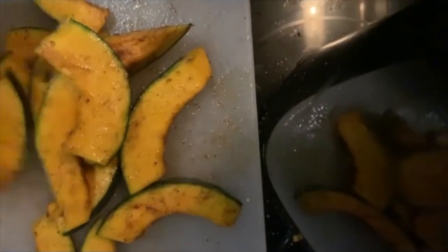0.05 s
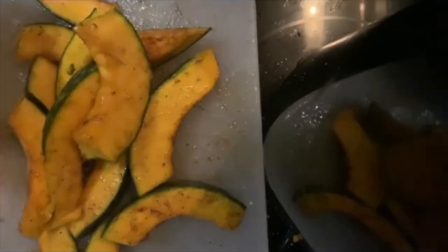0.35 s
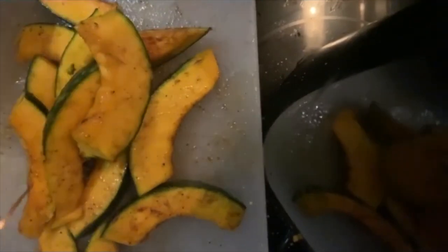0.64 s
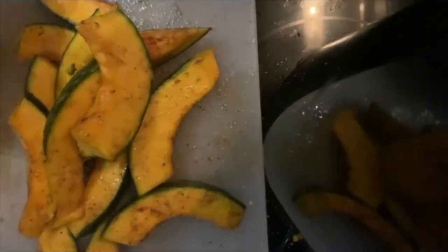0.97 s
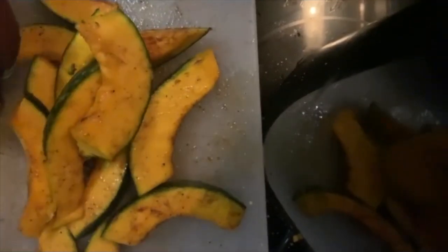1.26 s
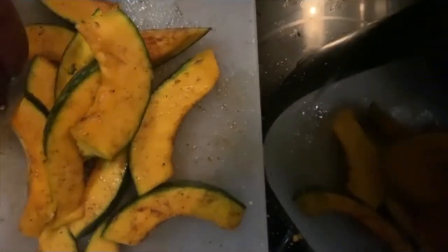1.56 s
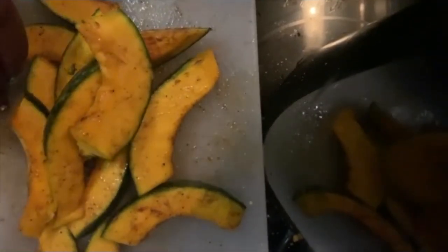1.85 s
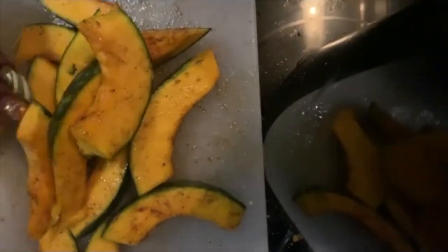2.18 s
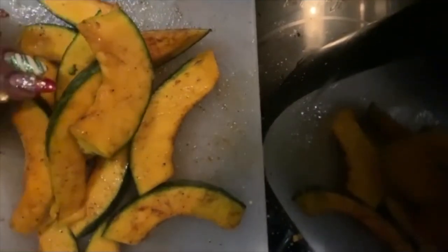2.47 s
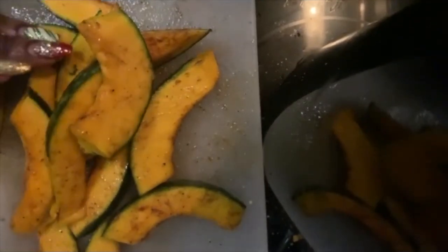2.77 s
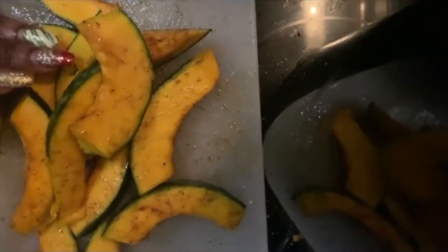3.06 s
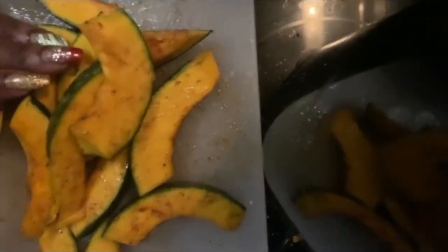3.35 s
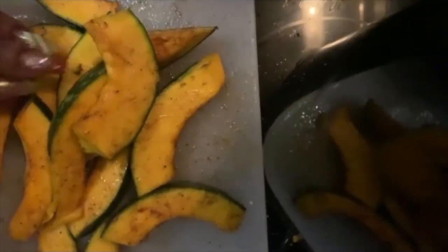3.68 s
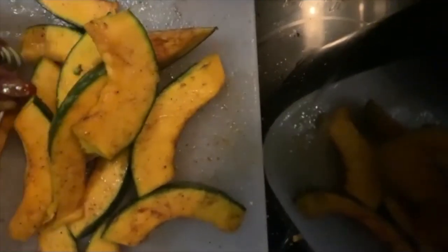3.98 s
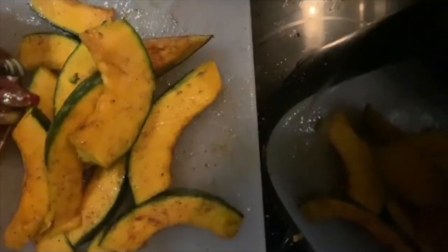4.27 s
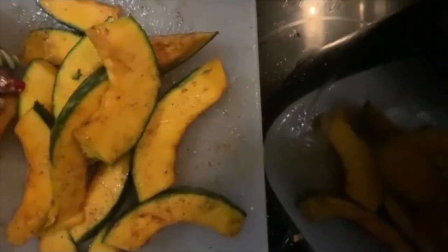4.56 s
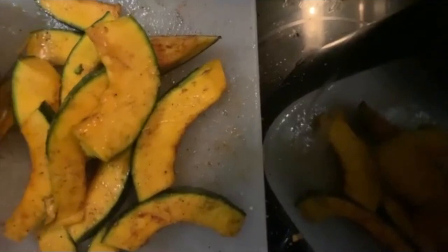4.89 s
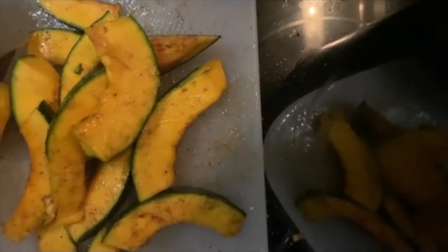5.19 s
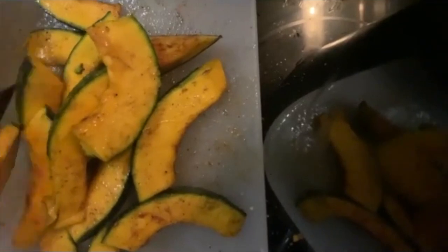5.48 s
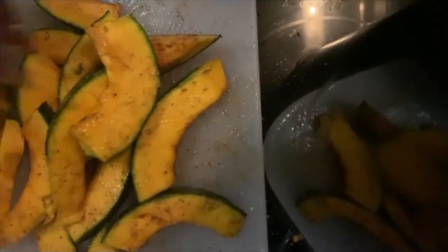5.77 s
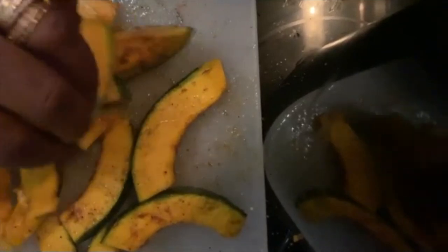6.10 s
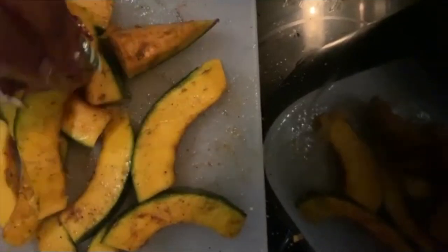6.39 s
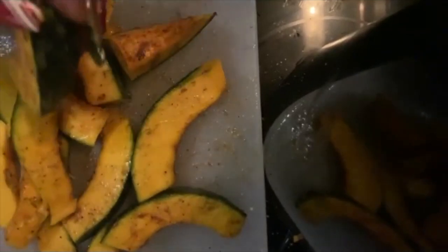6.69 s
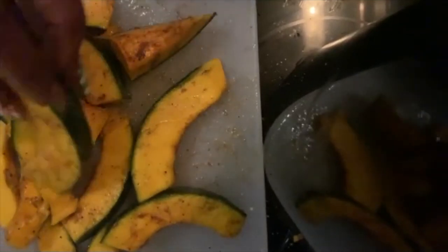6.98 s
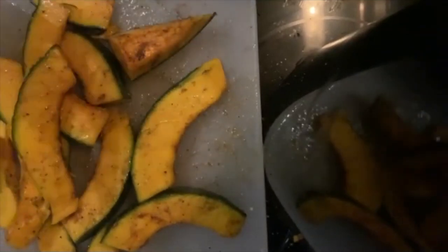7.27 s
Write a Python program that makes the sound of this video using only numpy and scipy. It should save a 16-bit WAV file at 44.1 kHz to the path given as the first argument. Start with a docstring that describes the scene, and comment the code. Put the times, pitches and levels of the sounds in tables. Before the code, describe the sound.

Wet squash slices are handled on a plastic cutting board, with squelches, smacks and a few dull knocks in a quiet kitchen.

```python
"""Quiet kitchen: a hand gathers wet squash slices on a plastic cutting board, close up.
Slices and fingers rub by stick-slip; wet faces squeak, peel apart and smack on trapped air,
and small bubbles burst in the film. Landing slices ring the board's low modes and jolt the counter.
Nails tick, touched steel rings faintly, and a small motor throbs over soft room air."""
import sys
import numpy as np
from scipy import signal
from scipy.fft import rfft, irfft
from scipy.io import wavfile
from scipy.ndimage import map_coordinates

SR = 44100
rng = np.random.default_rng(int(sys.argv[2]) if len(sys.argv) > 2 else 0)


def wrap_up_sound(samples):
    """Save the sound to the file named by the first command line argument, as 16-bit audio."""
    columns = np.atleast_2d(samples).T
    # keep every value between -1 and 1, then stretch to whole-number steps
    tamed = np.clip(columns, -1, 1)
    steps = np.round(tamed * 32767).astype(np.int16)
    wavfile.write(sys.argv[1], SR, steps)


N = 328104
T = np.arange(N) / SR

# motor speed: time_s, shaft_hz
SHAFT_SPEED = [(0, 31.25), (3.8, 31.25), (4.3, 31.145), (7.44, 31.14)]
# motor lines: shaft_multiple, twice_mains_multiple, level_db
HUM_LINES = [(2, 0, -12), (3, 0, -1), (4, 0, -6), (6, 0, -15), (7, 0, -10), (8, 0, -16), (10, 0, -12),
             (-1, 1, -5), (0, 1, 0), (1, 1, -11), (2, 1, -18)]
# gain on the background, ducking and recovering: time_s, gain_db
BACKGROUND_GAIN = [(0, -66), (.75, -69), (1.2, -65), (2, -62), (2.8, -60), (3.6, -63), (4.05, -71),
                   (4.5, -63), (5.3, -63), (5.85, -67), (6.15, -61.5), (6.6, -63.5), (7.44, -63.5)]
# room air, counter rumble: freq_hz, level_db
AIR_SPECTRUM = [(20, -29), (45, -21.5), (90, -1), (200, -2), (320, -4), (410, -23), (560, -7), (750, -20),
                (1200, -46.5), (1650, -33.5), (1950, -19), (2300, -39.5), (2900, -46), (10000, -53)]
COUNTER_SPECTRUM = [(15, -52), (30, -22), (50, -3), (90, -0.5), (165, -2), (250, -8.5), (380, -11),
                    (700, -36), (1500, -70)]
# hand leaning on the pile: start_s, length_s, level_db, swell_db
SHOVES = [(0.119, .014, -27, -5), (0.341, 0.031, -37.5, -13.5), (2.555, 0.059, -50, -15),
          (3.058, .018, -37.5, 1.5), (3.078, 0.05, -20, 1), (3.159, 0.028, -23.5, 0),
          (3.229, 0.057, -29.5, -5), (3.332, 0.017, -37.5, -5.5), (4.675, 0.015, -38.5, -6),
          (4.755, 0.13, -46, 1), (4.963, 0.019, -37, -7.5)]

# steel damped by wet slices, loaded board: freq_hz, level_db, t60_s
STEEL_MODES = [(2778, -14, .22), (3004, -8, .08), (3065, -10, .1), (3290, -8, .07), (3542, -9, .1),
               (4020, -10, .1), (4330, -10, .07), (6200, -14, .2), (6387, -5, .09), (6795, -14, .12),
               (7224, -9, .22), (7310, -8, .06), (7700, -12, .1), (8440, -6, .05), (8535, 0, .105),
               (8620, -7, .06), (9125, -13, .08), (9808, -15, .06)]
BOARD_MODES = [(554, 0, .088), (625, .5, .04), (480, -4, .032), (705, -17, .11), (930, -17, .04),
               (310, -12, .05), (235, -5, .05), (140, -9, .045)]
# fingernail: freq_hz, level_db, t60_s
NAIL_MODES = [(2100, 0, .0045), (2450, -14, .005), (1800, -28, .025)]
# touches on steel: start_s, level_db
CLINKS = [(.362, -46), (2.901, -34), (2.942, -46), (3.079, -33), (3.095, -32), (5.052, -31), (5.0795, -27)]
# nail flicks: start_s, peak_db, pan_db (left minus right throughout)
NAIL_TICKS = [(1.979, -43.5, -25), (2.8598, -9, -6), (4.495, -36, -23.5)]
# slices landing and rocking: start_s, level_db, pitch_hz, build_s
KNOCKS = [(0.1065, 1, 555, 0.0011), (0.1246, -18, 552, 0.0082), (0.232, -36.5, 546, 0.0035),
          (.36, -25.5, 576, 0.005), (2.864, -22.5, 565, 0.0018), (3.0845, -5, 543, 0.0034),
          (3.095, -12.5, 552, 0.00067), (3.108, -13, 550, 0.00084), (4.271, 0, 559, 0.00079),
          (4.298, -12.5, 559, 0.0043), (4.355, -27, 572, 0.0046), (4.384, -27.5, 600, 0.01),
          (4.407, -25, 551.5, 0.0098), (5.062, -26, 557, .003), (5.122, -34, 590, .004),
          (5.203, -29.5, 558, .004), (5.511, -27.5, 578, 0.0029), (6.054, -33, 569.5, 0.0029),
          (6.117, -31.5, 577, 0.002)]
# rind squeaks: start_s, length_s, pitch_hz, level_db, pan_db
SQUEAKS = [(.004, 0.049, 1894, -36, -5.5), (0.428, 0.013, 1517, -41, -6.5), (0.455, 0.01, 1100, -38, -6),
           (.584, 0.0048, 1612, -33, -6.5), (.775, 0.0046, 1510, -43.5, -13),
           (0.813, 0.028, 1480, -60, -15), (0.859, .014, 1467, -45.5, -5), (0.88, 0.0042, 1300, -32.5, -16),
           (0.898, 0.0045, 1370, -47, -8), (2.509, 0.0079, 1560, -43, -14.5),
           (2.527, 0.0092, 1650, -47, -13), (4.16, 0.0089, 3164, -48, -5), (4.2085, .024, 1890, -45.5, -10),
           (4.425, 0.0053, 1393, -53.5, -20), (4.926, 0.03, 1734, -38.5, -6.5),
           (5.037, .02, 3413, -37.5, -2), (5.08, .022, 3436, -33, -4), (5.184, .028, 1103, -29, -6),
           (5.227, .018, 1156, -34, -3)]
# taps closing an air pocket: start_s, pitch_hz, level_db, pan_db
POPS = [(0.3338, 1228, -13, -7), (.502, 1408, -39.5, -14), (0.5838, 1540, -24.5, -6.5),
        (.612, 1295, -28, -15), (0.849, 1400, -22.5, -12.5), (2.05, 1606, -57, -16),
        (2.796, 1455, -30, -14), (3.133, 1250, -23, -2.5), (3.166, 930, -20.5, -1.5),
        (4.272, 1270, -16.5, -1.5), (4.73, 1870, -28, -7), (4.746, 930, -20.5, -3.5),
        (4.786, 1870, -21, -9.5), (4.8197, 1794, -11, -9), (4.886, 1840, -29.5, -6.5),
        (4.959, 900, -16, -5), (4.969, 1400, -21, -5.5), (4.981, 1820, -19, 10), (5.025, 1170, -23.5, -3),
        (5.052, 1280, -24.5, -3.5), (5.0795, 2940, -13, -18), (5.09, 1190, -24.5, -2.5),
        (5.123, 1480, -33, -4), (5.186, 1080, -21.5, -10.5), (5.194, 1020, -17.5, -3.5),
        (5.198, 1800, -19.5, -4), (5.207, 1065, -17, -5), (5.224, 1060, -17.5, -4), (5.242, 1785, -29, 0.5),
        (5.27, 1230, -25, -7.5), (5.2937, 1406, -25.5, -8), (5.451, 1207, -33.5, -11)]

# finger strokes, one long and a list of short ones: time_s, skin_db, wet_db
LONG_STROKE = [(1.63, -90.5, -81.5), (1.704, -79, -49), (1.898, -53, -49), (1.96, -86, -63.5),
               (1.98, -75, -103), (2.004, -73.5, -74), (2.132, -75, -83), (2.216, -44.5, -51.5),
               (2.354, -59, -70.5), (2.404, -49, -48.5), (2.492, -56, -55.5), (2.518, -47, -50),
               (2.576, -66, -70), (2.64, -62.5, -62), (2.678, -48, -54.5), (2.786, -48, -58.5),
               (2.796, -42.5, -46.5), (2.84, -40, -50.5)]
SHORT_STROKES = [
    [(3.39, -67, -62), (3.416, -56.5, -85), (3.44, -40.5, -50.5), (3.474, -58.5, -99), (3.48, -62.5, -67.5),
     (3.51, -77, -94)],
    [(4.06, -88.5, -95), (4.098, -50.5, -52.5), (4.15, -55.5, -71), (4.198, -90, -102),
     (4.212, -46.5, -62.5), (4.255, -45, -56.5)],
    [(4.335, -49.5, -88.5), (4.349, -56, -57), (4.375, -59, -70), (4.405, -58, -60.5), (4.421, -47, -70),
     (4.47, -77, -103)],
]
# skin rasp, wet hiss: freq_hz, level_db
SKIN_SPECTRUM = [(1000, -24.5), (1450, -12), (1800, -3), (2400, -7), (3100, -21.5), (4000, -7.5),
                 (5000, -26), (7000, -46)]
WET_HISS_SPECTRUM = [(3500, -29.5), (5300, -5.5), (6300, -5), (7400, 3.5), (8800, -3.5), (10100, -5),
                     (11000, -43)]

# slice over slice: start_s, length_s, level_db, swell_db, wet_db, grit_db, pan_db, gap_hz
SLIDES = [(0, 0.13, -35.5, -17, 1.5, 0, -4.5, 989.5), (0.338, 0.14, -41, -13.5, -2, 4, -6.5, 1148),
          (0.756, 0.15, -58, 13.5, 10, 4.5, -3.5, 1340), (1.712, 0.22, -49.5, -0.5, -27, -4.5, -9.5, 925.7),
          (2.201, 0.06, -42.5, -14, -5.5, -20, -6, 795), (3.058, .011, -22.5, 1.5, -15, -5, -6.5, 850),
          (3.078, 0.045, -24, -1, 3, -0.5, -5.5, 1003), (3.122, 0.2, -40, -34, -3.5, 1, -1.5, 1011),
          (3.731, 0.073, -49.5, 2.5, 2, -0.5, -7.5, 1254), (4.719, 0.063, -37, 9, 10.5, 0, -4.5, 841),
          (4.779, .052, -40, -4.5, 11, 1.5, -3, 978), (4.943, .05, -28, 8, 3.5, -8.5, -4, 891),
          (5, .068, -35.5, 4.5, -3.5, 5, -4, 1079), (5.078, .07, -35.5, -14.5, -2, 11.5, -4.5, 1122),
          (5.184, 0.1, -33.5, -15, -6, -15, -3, 1032), (6.013, 0.063, -34.5, -21, -2.5, -2.5, -4.5, 940)]
# nails scraping rind: start_s, length_s, level_db, swell_db, wet_db, grit_db, pan_db
SCRAPES = [(2.902, 0.009, -31, -16, 9.5, 10.5, -7), (2.942, 0.11, -42.5, -31.5, 3, -1.5, -3),
           (4.761, 0.011, -35.5, -3, -3, 9, -6), (5.09, 0.0028, -31, -13, 14, 15.5, -1),
           (4.83, 0.077, -49.5, -3, -1, 6.5, -1), (4.924, 0.014, -37, -3, 1, -29, -7),
           (4.655, 0.036, -56.5, 2, -5.5, -1, -5.5), (5.385, 0.096, -53.5, -17.5, 7, -6, -4.5),
           (5.51, 0.079, -62, 20, 0.5, -29, -1), (5.91, 0.023, -55.5, 8, -14.5, -11, -11),
           (5.984, 0.02, -43.5, -6, 4.5, -0.5, -4.5), (6.22, 0.15, -64.5, -12.5, -15.5, -8, -2)]
# slice dragging on the board: start_s, length_s, level_db, swell_db
DRAGS = [(0.338, 0.032, -35, -5), (2.299, 0.032, -38.5, -14), (2.407, 0.03, -50.5, 0),
         (2.747, 0.08, -49, -0.5), (2.866, 0.074, -35.5, -13), (3.118, 0.25, -37, -16),
         (4.341, 0.11, -44.5, -9), (4.655, 0.021, -46.5, -12), (5.05, .11, -37.5, -4),
         (5.187, 0.046, -34.5, -2.5), (5.507, 0.065, -43.5, -5), (6.109, 0.06, -44.5, -20),
         (6.722, 0.36, -67.5, -4)]
# edges catching, wet faces peeling: start_s, level_db, pan_db
CATCHES = [(.102, -30, 0), (.3627, -31, 3), (2.9017, -27, -2.5), (3.067, -25.5, -1.5), (3.079, -25, -1),
           (3.0971, -24, 6.5), (3.7616, -35, -6), (4.143, -53.5, -3), (4.268, -34.5, -4.5),
           (4.283, -36.5, -4), (4.7448, -34.5, -6), (4.7945, -36, 2.5), (4.8191, -25, -4),
           (4.959, -26.5, -3), (4.9818, -22.5, 8), (5.2222, -35, -2.5), (6.0152, -32.5, -5),
           (6.0407, -39.5, -7), (6.104, -42.5, -5.5)]
PEELS = [(.1259, -46, -2), (.1695, -49.5, -2.5), (.5835, -38.5, -3.5), (.885, -42, -6.5),
         (1.692, -53.5, -6), (1.7698, -46.5, -1.5), (2.752, -48.5, -3), (2.9017, -27.5, -5.5),
         (2.941, -28.5, 1), (3.481, -54.5, -4), (4.7855, -17.5, -5), (4.7945, -28.5, -4),
         (4.8191, -23.5, -1.5), (4.8865, -39, -5.5), (4.9242, -40.5, -5.5), (5.0513, -25, -2),
         (5.079, -28.5, 13), (5.3855, -33.5, -1)]
# parts a contact excites (flesh, board, gaps, wet film, rind): freq_hz, level_db
RASP_SPECTRUM = [(900, -34), (1350, -12.5), (1870, 3), (2400, -2.5), (3000, -12), (4500, -37.5)]
BOARD_SPECTRUM = [(120, -33.5), (300, -14.5), (430, -14.5), (560, 5.5), (700, -4.5), (900, -22),
                  (1500, -61)]
HOLLOW_SPECTRUM = [(450, -32), (720, -9.5), (1000, 6), (1250, -0.5), (1600, -3), (2600, -42.5)]
FIZZ_SPECTRUM = [(3500, -31.5), (5300, 7), (6800, 6), (8400, 3.5), (9100, 0), (10100, 1.5), (11000, -37)]
GRIT_SPECTRUM = [(2000, -29), (2900, 1), (3400, -2.5), (4200, -1), (5100, -8), (7000, -33.5)]

# force share by contact kind: rasp_db, board_db, hollow_db, fizz_db, grit_db
SLIDE_MIX_DB = (-2.5, -10.5, -7, -6.5, -3.5)
SCRAPE_MIX_DB = (1, -18.5, -13.5, -5, 0)
DRAG_MIX_DB = (-24, -1, -27.5, -39, -34)
CATCH_MIX_DB = (0, -15.5, -4.5, -6, -4)
PEEL_MIX_DB = (-8, -24, -18, 1, -7)
POP_MIX_DB = (-25, -36, -25, -37, -31)
# share gained above MID_FORCE_DB, same order
PRESS_DB_PER_DB = (0.19, 0.52, 0.031, -0.021, 0.38)

# phase between the microphone ports: freq_hz, left_lead_rad
PORT_PHASE = [(0, 0), (100, -.5), (300, -1.2), (750, -1.3), (1100, -1.5), (1700, .7), (2100, .7),
              (2600, 2.3), (3600, 1.9), (5000, 2.9), (7000, 5.4), (8200, 6.2), (9200, 6.6), (10300, 7.6)]

MID_FORCE_DB, POCKET_GLIDE_OCT_PER_S = -40, 8.1


def undb(db):
    """Decibels to gain."""
    return np.exp(np.asarray(db) * (np.log(10) / 20))


def unit(x):
    """Scale to rms 1."""
    return x / np.sqrt(np.mean(x ** 2))


def seconds(length_s):
    """Time axis of a short sound."""
    return np.arange(max(int(length_s * SR), 2)) / SR


def add(track, start_s, sound, pan_db=0):
    """Mix a mono or stereo sound into a stereo track."""
    i = int(start_s * SR)
    sound, i = sound[..., max(-i, 0):N - i], max(i, 0)
    track[:, i:i + sound.shape[-1]] += unit(undb(np.array([[pan_db], [-pan_db]]) / 2)) * sound


def colour(spectrum, size=4096):
    """Minimum-phase response of unit energy."""
    hz, db = np.transpose(spectrum)
    bins_hz = np.fft.rfftfreq(size, 1 / SR)
    log_gain = np.log(undb(np.interp(np.log(bins_hz + 1), np.log(hz), db)))
    cepstrum = irfft(log_gain)
    cepstrum[1:size // 2] *= 2
    cepstrum[size // 2 + 1:] = 0
    response = irfft(np.exp(rfft(cepstrum)))
    return response / np.linalg.norm(response)


def through(x, response):
    """Convolve, cut to scene length."""
    return signal.fftconvolve(np.atleast_2d(x), np.atleast_2d(response), axes=1)[:, :N]


def ring(modes, t, detune=0):
    """Sum of decaying modes."""
    return sum(undb(db - 60 * t / t60_s) * np.sin(2 * np.pi * hz * (1 + detune) * t)
               for hz, db, t60_s in modes)


def wander(t, rate_hz, count=64):
    """Gaussian values joined by straight lines."""
    return np.interp(t, np.arange(count) / rate_hz, rng.standard_normal(count))


def push(t, length_s, swell_db, release_s):
    """Force that swells or fades evenly, then lets go."""
    return undb(swell_db * np.clip(t / length_s, 0, 1)) * np.exp(-np.maximum(t - length_s, 0) / release_s)


def slips(size, rate_hz, spread_db, smooth):
    """Stick-slip: unequal clicks over smooth hiss."""
    chance, strength, noise = (np.resize(draw(size=SR // 3), size)
                               for draw in (rng.random, rng.exponential, rng.standard_normal))
    clicks = (chance < rate_hz / SR) * undb(spread_db * np.minimum(strength, 4)) * np.sign(noise)
    return unit(clicks + smooth * noise + 1e-9)


def pocket(lo_hz, hi_hz, t60_s, scatter_rad, count):
    """Gaps around a contact: short random resonances, out of phase between the ports."""
    t = seconds(.04)
    hz = lo_hz * (hi_hz / lo_hz) ** ((np.arange(count) + rng.random(count)) / count)
    phase = rng.uniform(0, 2 * np.pi, (count, 1, 1)) + scatter_rad * rng.standard_normal((count, 2, 1))
    return np.sin(2 * np.pi * hz[:, None, None] * t + phase).sum(0) * undb(-60 * t / t60_s)


def kitchen(x, wet_db, t60_s, width):
    """Add dense echoes from counter and cupboards."""
    t = seconds(.2)
    shared, left, right = rng.standard_normal((3, len(t)))
    onset = np.clip(t / 0.0015 - 1, 0, 1)
    tail = (shared + width * np.array([left, right])) * undb(-60 * t / t60_s) * onset
    return x + undb(wet_db) * through(x, tail / np.linalg.norm(tail[0]))


def room_air():
    """Low, nearly mono noise."""
    return through(rng.standard_normal(N) + 0.1 * rng.standard_normal((2, N)), colour(AIR_SPECTRUM))


def motor(mains_hz=60):
    """Shaft harmonics beat against magnetic hum at about 5 Hz."""
    turns = np.cumsum(np.interp(T, *np.transpose(SHAFT_SPEED))) / SR
    return np.sqrt(2) * sum(undb(db) * np.cos(2 * np.pi * (order * turns + magnetic * 2 * mains_hz * T))
                            for order, magnetic, db in HUM_LINES)


def background():
    """One gain curve ducks and restores the hum and room hiss."""
    return undb(np.interp(T, *np.transpose(BACKGROUND_GAIN))) * (motor() + undb(-6) * room_air())


def steel(scrape_s=0.0025):
    """Each touch is a short scrape that reweights the modes and roughens the ring."""
    out, t = np.zeros((2, N)), seconds(.35)
    for start_s, db in CLINKS:
        modes = ring(STEEL_MODES, t, detune=0.00076 * rng.standard_normal())
        scrape = rng.standard_normal(len(t)) * np.exp(-t / scrape_s)
        clink = signal.fftconvolve(modes, scrape)
        onset_rms = np.sqrt(np.mean(clink[:int(.04 * SR)] ** 2))
        add(out, start_s, undb(db) * clink / onset_rms, pan_db=-1.5)
    return kitchen(out, wet_db=-5, t60_s=0.053, width=0.7)


def counter(jolt_db=-22, jolt_decay_s=0.028):
    """The counter shudders at each landing and rumbles under the leaning hand."""
    force, response, t = np.zeros((2, N)), colour(COUNTER_SPECTRUM), seconds(.45)
    jolts = [(start_s, jolt_decay_s / 2, db + jolt_db, np.exp(-t / jolt_decay_s))
             for start_s, db, *_ in KNOCKS]
    leans = [(start_s, length_s, db, push(t, length_s, swell_db, release_s=0.038))
             for start_s, length_s, db, swell_db in SHOVES]
    for start_s, length_s, db, load in jolts + leans:
        shake = rng.standard_normal(len(t)) * load
        shake *= np.sqrt(length_s * SR) / np.linalg.norm(signal.fftconvolve(shake, response))
        add(force, start_s, undb(db) * shake, pan_db=1)
    return kitchen(through(force, response), wet_db=-14, t60_s=.1, width=0.99)


def nails(rise_s=.0018):
    """A nail flicks off an edge: a few bright cycles, damped by the finger."""
    out, t = np.zeros((2, N)), seconds(.03)
    tick = ring(NAIL_MODES, t) * (1 - np.exp(-(t / rise_s) ** 2))
    for start_s, db, pan_db in NAIL_TICKS:
        add(out, start_s, undb(db) * tick / np.abs(tick).max(), pan_db)
    return kitchen(out, wet_db=-15, t60_s=.06, width=1)


def judder(gain, lo_hz, hi_hz, t60_s, rate_hz=130, spread_db=4):
    """Skin grips and lets go at random; each slip rings a small gap."""
    out = np.zeros((2, N))
    for when, size in rng.random((int(rate_hz * N / SR), 2)):
        i = int(when * N)
        if gain[i] > undb(-75):
            slip = pocket(lo_hz, hi_hz, t60_s, scatter_rad=0.48, count=2)
            add(out, i / SR, gain[i] * undb(-spread_db * np.log(size + .05)) * slip / np.linalg.norm(slip))
    return out * np.sqrt(SR / rate_hz)


def fingers(patch_hz=45, patch_db=2.5, echo_s=.0004, echo_swing=.42, echo_gain=.8):
    """Skin rasps and film hisses over wet and dry patches; the board's echo combs the moving rub."""
    skin_gain, wet_gain = np.zeros((2, N))
    for stroke in [LONG_STROKE, *SHORT_STROKES]:
        time_s, skin_db, wet_db = np.transpose(stroke)
        outside_s = np.abs(T - np.clip(T, time_s[0], time_s[-1]))
        fade_db = -26.5 * np.minimum(outside_s / 0.058, 10)
        skin_gain += undb(np.interp(T, time_s, skin_db) + fade_db)
        wet_gain += undb(np.interp(T, time_s, wet_db) + fade_db - 1)
    out = np.zeros((2, N))
    for gain, spectrum, pan_db, gaps in [(skin_gain, SKIN_SPECTRUM, -4, (1400, 2600, .022)),
                                         (wet_gain, WET_HISS_SPECTRUM, -1, (6300, 10000, .012))]:
        grain = unit(rng.standard_normal(N) * undb(np.minimum(rng.exponential(size=N), 6) * 3.9))
        patches = undb(patch_db * wander(T, patch_hz, count=int(T[-1] * patch_hz) + 2))
        direct = through(gain * patches * grain, colour(spectrum))[0]
        hand = np.interp(T, np.arange(64) * .12, rng.uniform(-1, 1, 64))
        delay_s = echo_s * (1 + echo_swing * hand)
        echo = map_coordinates(direct, [(T - delay_s) * SR], order=2)
        rub = (direct + echo_gain * echo) / np.hypot(1, echo_gain)
        add(out, 0, undb(-4) * rub + undb(-5) * judder(gain, *gaps), pan_db)
    return kitchen(out, wet_db=-4.5, t60_s=0.12, width=1)


def bubbles(rate_hz=92, spread_db=4, t60_s=0.031, range_oct=1.2, tick_db=-3.5):
    """Slides squeeze the film into bubbles; each bursts with a tick and a rising ring."""
    out, t = np.zeros((2, N)), seconds(.04)
    glide = 2 ** (POCKET_GLIDE_OCT_PER_S * t / 2) - 1
    for start_s, length_s, db, swell_db, wet_db, _, pan_db, gap_hz in SLIDES:
        count = int(rate_hz * length_s)
        for k, (when, pitch, size, tick, side) in enumerate(rng.random((32, 5))[:count]):
            progress = (k + when) / count
            modes = [(0.71 * gap_hz * 2 ** (range_oct * pitch), 0, t60_s),
                     (3000 + 2000 * tick, tick_db, .006),
                     (6500 + 3000 * tick, tick_db + wet_db / 2, .005)]
            burst = ring(modes, t, glide) * (1 - np.exp(-t / .0003))
            stroke_db = db + swell_db * (progress - .5) - abs(swell_db) / 6
            level_db = stroke_db - 1 - spread_db * np.log(size + 0.13)
            add(out, start_s + progress * length_s, undb(level_db) * burst, pan_db + 6 * (side - .5))
    return kitchen(out, wet_db=-8, t60_s=.08, width=0.99)


def squeaks(slip_hz=450, waver=.06, rough_db=4, octave_db=-23, rise_s=.002):
    """Wet rind sticks and slips, keeping one pocket ringing; pitch wavers with the grip."""
    out, t = np.zeros((2, N)), seconds(.1)
    for start_s, length_s, hz, db, pan_db in SQUEAKS:
        phase = 2 * np.pi * np.cumsum(hz * (1 + waver * wander(t, slip_hz))) / SR
        grip = undb(rough_db * wander(t, slip_hz))
        force = push(t, length_s, swell_db=-5.5, release_s=.003) * (1 - np.exp(-(t / rise_s) ** 2))
        squeak = force * grip * (np.sin(phase) + undb(octave_db) * np.sin(2 * phase))
        add(out, start_s, undb(db) * np.sqrt(length_s * SR) * squeak / np.linalg.norm(squeak), pan_db)
    return kitchen(out, wet_db=-6.5, t60_s=0.052, width=0.99)


def squelches(glide_oct_per_s=1, bandwidth_hz=140):
    """Slips sound the gap between sliding slices; its pitch rises as it narrows."""
    out, t = np.zeros((2, N)), seconds(.35)
    pole = np.exp(-np.pi * bandwidth_hz / SR)
    for start_s, length_s, db, swell_db, *_, pan_db, gap_hz in SLIDES:
        pitch_hz = gap_hz * 2 ** (glide_oct_per_s * (t - length_s / 2))
        carrier = np.exp(2j * np.pi * np.cumsum(pitch_hz) / SR)
        load = push(t, length_s, swell_db, release_s=0.0088) * (1 - np.exp(-t / 0.00095))
        force = load * slips(len(t), rate_hz=1500, spread_db=4.5, smooth=0.2)
        resonance = np.real(carrier * signal.lfilter([1], [1, -pole], force / carrier))
        band = signal.butter(2, [gap_hz / 1.4, gap_hz * 1.4], "band", fs=SR, output="sos")
        gap = signal.sosfilt(band, resonance)
        add(out, start_s, undb(db - 4.5) * np.sqrt(length_s * SR) * gap / np.linalg.norm(gap), pan_db)
    return kitchen(out, wet_db=-5, t60_s=.07, width=1)


def pops(mid_t60_s=0.024, mid_rise_s=0.0014, halving_db=29.5):
    """Trapped air smacks, rising in pitch as the pocket shrinks; firmer taps ring shorter."""
    out, t = np.zeros((2, N)), seconds(.08)
    for start_s, hz, db, pan_db in POPS:
        softness = 2 ** ((MID_FORCE_DB - db) / halving_db)
        t60_s, rise_s = mid_t60_s * softness, mid_rise_s * softness
        modes = [(hz, 0, t60_s), (1.17 * hz, -4, t60_s / 2), (.84 * hz, -5, t60_s / 2)]
        glide = 2 ** (POCKET_GLIDE_OCT_PER_S * (t / 2 - rise_s)) - 1
        smack = ring(modes, t, glide) * (1 - np.exp(-(t / rise_s) ** 2))
        add(out, start_s - rise_s / 2, undb(db + 3.5) * smack, pan_db)
    return kitchen(out, wet_db=-4.5, t60_s=0.03, width=2.7)


def shares(mix_db, db, wet_db=0, grit_db=0):
    """Level of each part for one contact; more force favours the board."""
    press_db = np.array(PRESS_DB_PER_DB) * (db - MID_FORCE_DB)
    return db + np.array(mix_db) + press_db + np.array([0, 0, 0, wet_db, grit_db])


def rubs():
    """Sliding contacts: start_s, length_s, swell_db, levels_db, pan_db."""
    for rows, mix_db in [(SLIDES, SLIDE_MIX_DB), (SCRAPES, SCRAPE_MIX_DB)]:
        for start_s, length_s, db, swell_db, wet_db, grit_db, pan_db, *_ in rows:
            yield start_s, length_s, swell_db, shares(mix_db, db, wet_db, grit_db), pan_db
    for start_s, length_s, db, swell_db in DRAGS:
        yield start_s, length_s, swell_db, db + np.array(DRAG_MIX_DB), -4


def snaps():
    """Sudden contacts: start_s, levels_db, pan_db."""
    for rows, mix_db in [(CATCHES, CATCH_MIX_DB), (PEELS, PEEL_MIX_DB), (POPS, POP_MIX_DB)]:
        for start_s, *_, db, pan_db in rows:
            yield start_s, shares(mix_db, db), pan_db


def contacts(spectrum, part, gap_hz, gap_t60_s, scatter_rad, gap_count, gap_gain,
             slip_hz, spread_db, smooth, snap_decay_s, rub_db, snap_db, lean_db):
    """Contacts from one part. Rubs trail off; each snap has a faint, brief lead-in of noise."""
    out, response = np.zeros((2, N)), colour(spectrum, size=1024)

    def radiate(force, length_s):
        """Direct sound plus ringing gaps, with the energy of length_s at rms 1."""
        direct = through(force, response)
        ringing = through(direct, pocket(*gap_hz, gap_t60_s, scatter_rad, gap_count))
        sound = unit(direct) + gap_gain * unit(ringing[:, :direct.shape[1]])
        return sound * np.sqrt(2 * length_s * SR) / np.linalg.norm(sound)

    for start_s, length_s, swell_db, levels_db, pan_db in rubs():
        attack_s = np.interp(levels_db.max(), [-52, -32], [.06, .012])  # light strokes ease in
        t = seconds(attack_s + length_s + .12) - attack_s
        hold = push(t, length_s, swell_db, release_s=0.0013 + 0.012 * length_s)
        trail = undb(-14) * push(t, length_s, swell_db, release_s=0.022)
        grip = (hold + trail) / (1 + np.exp(-5.5 * t / attack_s))
        flutter = undb(7 * wander(t + attack_s, rate_hz=1 / .014, count=40))
        rub = radiate(grip * flutter * slips(len(t), slip_hz, spread_db, smooth), length_s)
        add(out, start_s - attack_s, undb(levels_db[part] + rub_db) * rub, pan_db + lean_db)
    t = seconds(.04) - .015
    after_s = np.maximum(t, 0)
    burst = (1 - np.exp(-after_s / 0.0027)) * np.exp(-after_s / snap_decay_s)
    lead_in = undb(-21.5) * np.exp(-np.abs(t) / .003)
    for start_s, levels_db, pan_db in snaps():
        snap = radiate(rng.standard_normal(len(t)) * (burst / burst.max() + lead_in), length_s=.008)
        add(out, start_s + t[0], undb(levels_db[part] + snap_db) * snap, pan_db + lean_db)
    return out


def slices():
    """Each contact rasps, drums the board, sounds the gaps, fizzes in the film and scratches the rind."""
    rasp = contacts(RASP_SPECTRUM, part=0, gap_hz=(1400, 3600), gap_t60_s=0.018, scatter_rad=1.2,
                    gap_count=4, gap_gain=0.88, slip_hz=390, spread_db=4.5, smooth=0.13,
                    snap_decay_s=0.00048, rub_db=-4, snap_db=-4.5, lean_db=-4)
    board = contacts(BOARD_SPECTRUM, part=1, gap_hz=(490, 680), gap_t60_s=0.061, scatter_rad=0.083,
                     gap_count=3, gap_gain=0.086, slip_hz=570, spread_db=4, smooth=0.3,
                     snap_decay_s=0.0011, rub_db=0.5, snap_db=-5.5, lean_db=3.5)
    hollow = contacts(HOLLOW_SPECTRUM, part=2, gap_hz=(780, 1300), gap_t60_s=0.021, scatter_rad=1.9,
                      gap_count=3, gap_gain=1, slip_hz=380, spread_db=3.6, smooth=0.1,
                      snap_decay_s=0.003, rub_db=-6, snap_db=-2.5, lean_db=-3.5)
    fizz = contacts(FIZZ_SPECTRUM, part=3, gap_hz=(3800, 8100), gap_t60_s=0.014, scatter_rad=0.15,
                    gap_count=7, gap_gain=0.85, slip_hz=1200, spread_db=3, smooth=0.22,
                    snap_decay_s=0.0011, rub_db=0.5, snap_db=0.5, lean_db=4)
    grit = contacts(GRIT_SPECTRUM, part=4, gap_hz=(2200, 4200), gap_t60_s=0.036, scatter_rad=0.33,
                    gap_count=5, gap_gain=0.9, slip_hz=430, spread_db=3.5, smooth=0.089,
                    snap_decay_s=0.00062, rub_db=-4.5, snap_db=-5, lean_db=3)
    return (kitchen(rasp + grit, wet_db=-5, t60_s=0.091, width=0.97)
            + kitchen(board, wet_db=-9, t60_s=0.062, width=0.11)
            + kitchen(hollow, wet_db=-6.5, t60_s=0.091, width=0.51)
            + kitchen(fizz, wet_db=-12.5, t60_s=0.14, width=0.69))


def knocks(contact_s=0.0013, chatter_db=5, chatter_hz=290):
    """Soft flesh rings the board's low modes; the ring builds as the slice settles and chatters."""
    out, t = np.zeros((2, N)), seconds(0.21)
    pulse = np.exp(-(seconds(2 * contact_s) / contact_s * 4 - 4) ** 2 / 2)
    for start_s, db, hz, build_s in KNOCKS:
        bend = ring(BOARD_MODES, t, detune=hz / BOARD_MODES[0][0] - 1) * (1 - np.exp(-(t / build_s) ** 2))
        velocity = np.gradient(signal.fftconvolve(bend, pulse))[:len(t)]
        chatter = wander(t, chatter_hz) * np.minimum(t / .02, 1)
        gain = undb(db - 2.5 + chatter_db * chatter)
        add(out, start_s - contact_s / 2, gain * velocity / np.abs(velocity).max())
    return kitchen(out, wet_db=-15, t60_s=0.077, width=.5)


def scene():
    """Sum of all sources."""
    return (slices() + fingers() + squelches() + bubbles() + pops() + squeaks() + nails()
            + knocks() + counter() + steel() + background())


def record(dry):
    """Two microphone ports shift the channel phase; peaks are rounded, the top is cut."""
    ceiling, top_hz = .9, 10400
    lead_rad = np.interp(np.fft.rfftfreq(N, 1 / SR), *np.transpose(PORT_PHASE))
    ports = irfft(rfft(dry) * np.exp(.5j * np.array([lead_rad, -lead_rad])), N)
    rounded = ports / (1 + (ports / ceiling) ** 8) ** (1 / 8)
    return signal.sosfilt(signal.ellip(6, .3, 70, top_hz, fs=SR, output="sos"), rounded)


dry = scene()
out = record(dry)
wrap_up_sound(out)
```